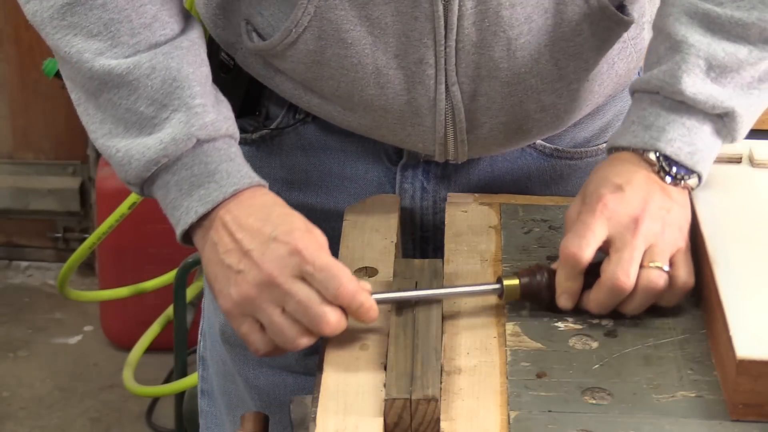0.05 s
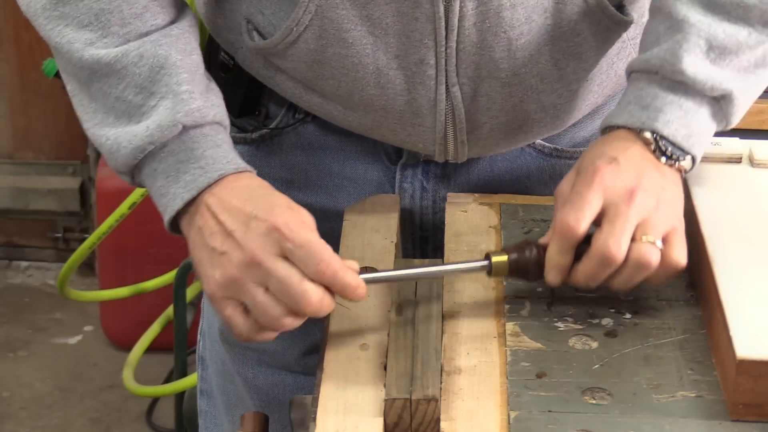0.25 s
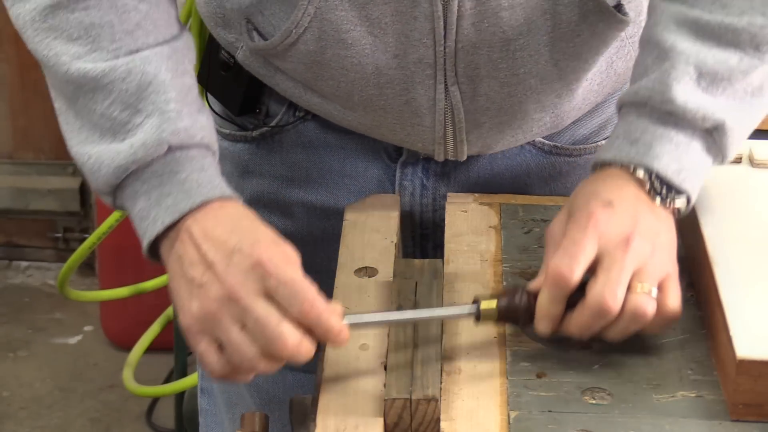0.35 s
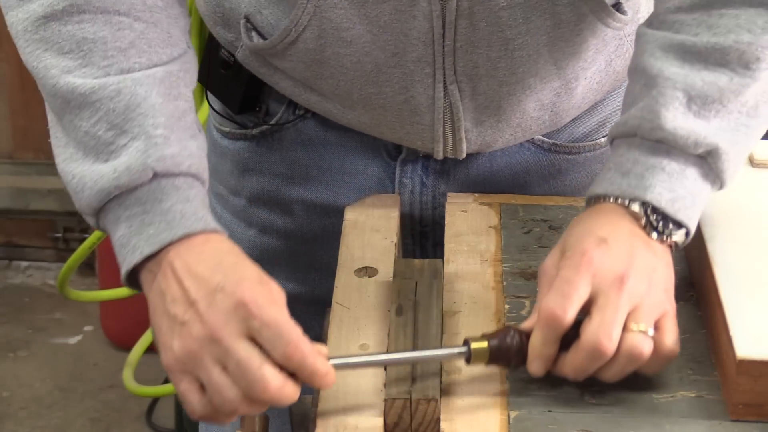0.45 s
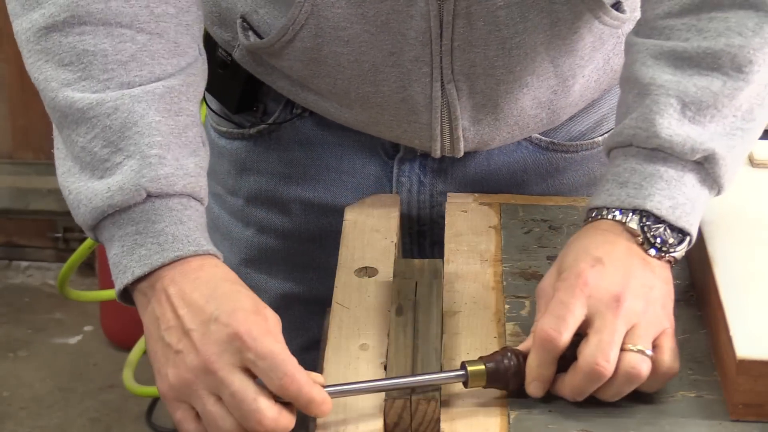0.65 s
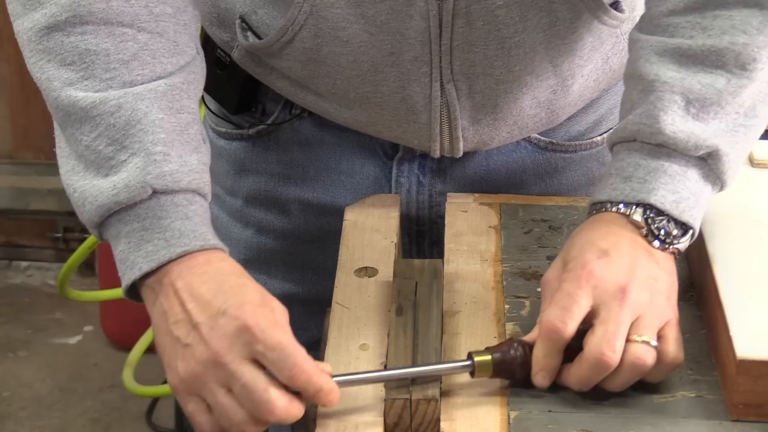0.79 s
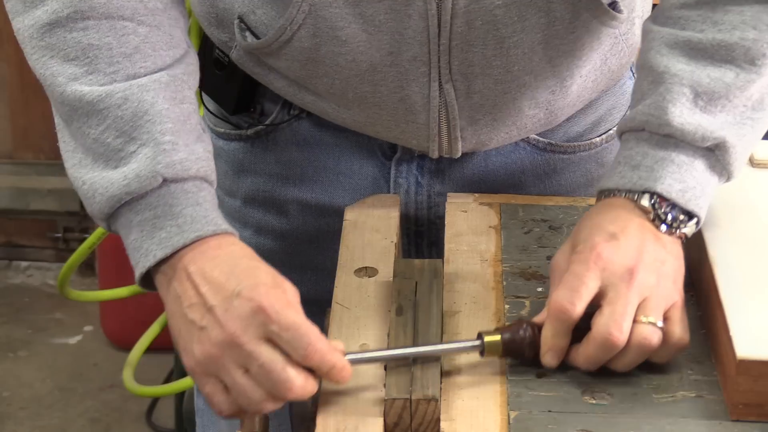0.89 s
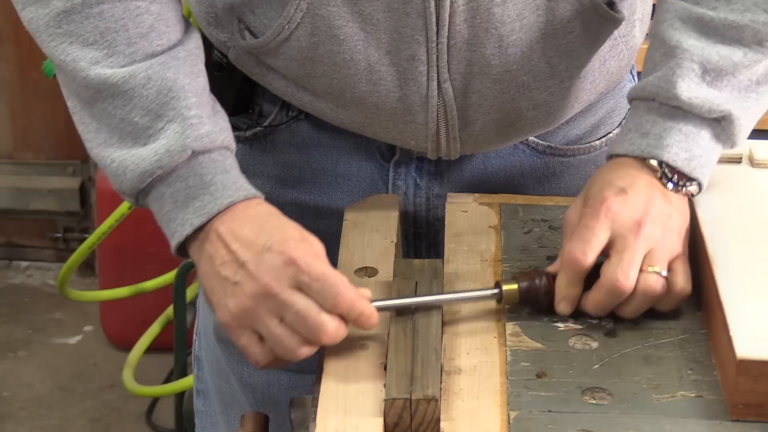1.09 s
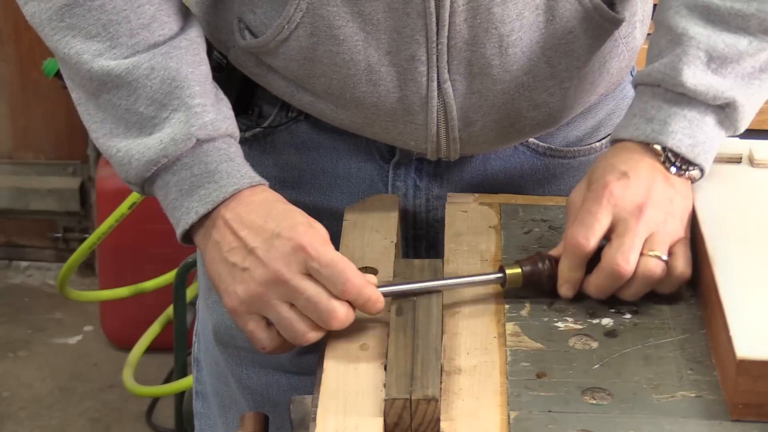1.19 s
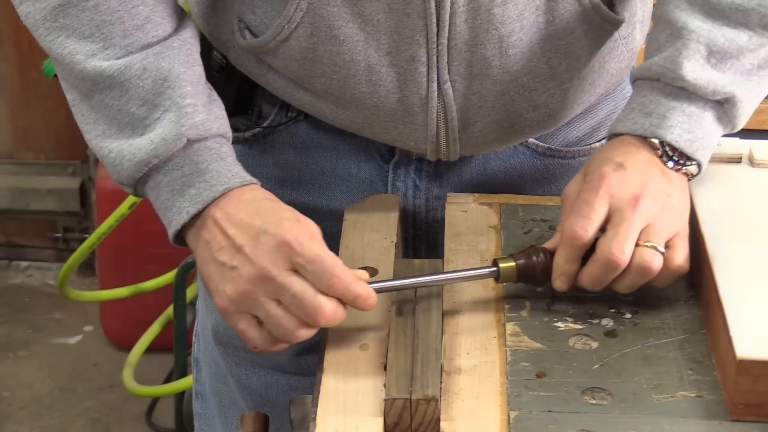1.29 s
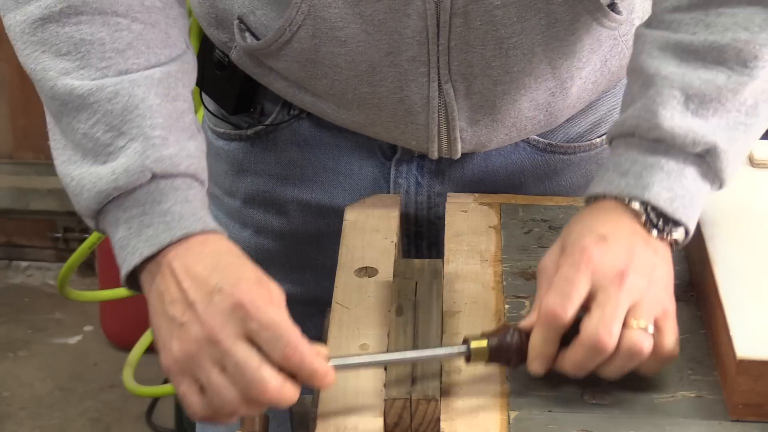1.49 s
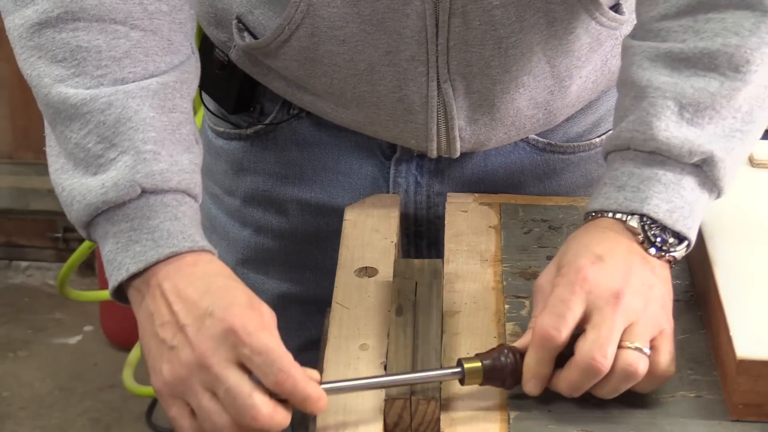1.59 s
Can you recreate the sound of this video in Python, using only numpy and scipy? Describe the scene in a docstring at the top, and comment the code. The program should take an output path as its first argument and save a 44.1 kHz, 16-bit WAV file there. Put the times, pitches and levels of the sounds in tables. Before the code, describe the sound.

Two close, gritty scrapes of a steel rod on a clamped metal blade each end in a wooden knock. Between them come a ringing metal clack and low bumps on the bench. The small workshop echoes briefly over faint hiss.

```python
"""Two rasping strokes of steel on steel, each ending in a wooden knock, in a small workshop.
A rod is drawn along the edge of a scraper clamped in a wooden bench vise: tiny slips shake rod,
edge and bench, then the rod grates over the corner and drops onto the wood. Between the strokes
it is set back on the edge with a bright clack and a few soft bumps. The room rings briefly."""
import sys
import numpy as np
from scipy import signal
from scipy.io import wavfile

SR = 44100
rng = np.random.default_rng(int(sys.argv[2]) if len(sys.argv) > 2 else 0)


def generate_wav(sig):
    """Save sig (samples, or channels by samples) to the path in sys.argv[1] as 16-bit PCM at SR."""
    pcm = np.round(np.clip(np.atleast_2d(sig).T, -1, 1) * 32767).astype(np.int16)
    wavfile.write(sys.argv[1], SR, pcm)


N = 72765
TIME = np.arange(N) / SR


def amp(db):
    """Decibels to gain."""
    return 10 ** (np.asarray(db) / 20)


def unit(x):
    """Scale to rms 1."""
    return x / np.sqrt(np.mean(x ** 2) + 1e-20)


def read(points, hz):
    """Interpolate (Hz, value) rows on a log-frequency axis."""
    points_hz, values = np.transpose(points)
    return np.interp(np.log(hz + 1), np.log(points_hz + 1), values)


def add(mix, start_s, sound):
    """Mix a sound in at start_s."""
    part = mix[max(round(start_s * SR), 0):][:len(sound)]
    part += sound[:len(part)]


def impulse(spectrum):
    """Minimum-phase click of energy 1 from (Hz, dB) rows."""
    hz = abs(np.fft.fftfreq(8192, 1 / SR))
    log_gain = np.log(amp(np.maximum(read(spectrum, hz), -100)))
    click = np.fft.ifft(np.exp(np.conj(signal.hilbert(log_gain)))).real[:4096]
    return click / np.linalg.norm(click)


def colour(x, spectrum):
    """Filter by (Hz, dB) rows, to rms 1."""
    return unit(signal.fftconvolve(x, impulse(spectrum))[:len(x)])


def resonate(x, hz, width_hz):
    """Steep resonance following the curve hz, to rms 1."""
    carrier = np.exp(2j * np.pi * np.cumsum(hz) / SR)
    pole = np.exp(-np.pi * width_hz / SR)
    return unit((carrier * signal.lfilter([1], np.poly([pole, pole]), x / carrier)).real)


def room(x, wet_db, echoes_per_s=3000):
    """Add the workshop's reflections, each band dying at its own rate."""
    # Each row: frequency in Hz, T60 in seconds.
    decay = [(100, 0.38), (260, 0.55), (700, 0.56), (1840, 0.46), (4850, 0.21), (10000, 0.19)]
    t = TIME[:SR // 2]
    taps = rng.choice([-1., 1.], len(t)) * (rng.random(len(t)) < echoes_per_s / SR) * (t > .005)
    hz, frame_s, bands = signal.stft(taps, SR, nperseg=256)
    bands = bands * amp(-60 * frame_s / read(decay, hz)[:, None])
    tail = signal.istft(bands, SR, nperseg=256)[1]
    return x + amp(wet_db) * signal.fftconvolve(x, tail / np.linalg.norm(tail))[:N]


def room_tone(level_db=-51):
    """Steady, mostly low noise of the workshop."""
    # Each row: frequency in Hz, relative level in dB.
    spectrum = [(12, -26), (20, -1.5), (129, -1.5), (569, -6), (631, -10), (716, -17), (1190, -13),
                (1390, -20.5), (1670, -20), (1890, -21), (2100, -20.5), (9000, -31), (11700, -50),
                (19800, -120)]
    return amp(level_db) * colour(rng.standard_normal(N), spectrum)


def mic_hiss(level_db=-58.5):
    """Microphone self-noise, independent in each channel."""
    spectrum_hz_db = [(15, 21), (80, 14.5), (200, 8), (1000, -2.5), (8000, 6.5), (16000, 3)]
    return amp(level_db) * np.array([colour(noise, spectrum_hz_db) for noise in rng.standard_normal((2, N))])


def bumps():
    """Hands bump the bench: low, soft swings of a few cycles at most."""
    # Each row: centre in seconds, frequency in Hz, half-width in seconds, level in dB.
    swings = [(0.718, 42.4, 0.014, -27.5), (0.778, 32.4, 0.013, -34.5), (0.821, 49.6, 0.039, -38.5),
              (0.865, 77, 0.012, -30), (0.902, 81, 0.0059, -27), (0.921, 43, 0.016, -33),
              (1.042, 65, 0.0073, -47)]
    mix = np.zeros(N)
    for centre_s, hz, width_s, db in swings:
        t = TIME - centre_s
        mix += amp(db) * np.exp(-(t / width_s) ** 2) * np.cos(2 * np.pi * hz * t)
    return mix


def ring(modes):
    """Struck modes of alternating sign, each swelling over its first cycle, then decaying."""
    t = TIME[:SR // 2]
    mix = np.zeros(len(t))
    for k, (hz, db, t60_s) in enumerate(modes):
        attack = 1 - np.exp(-(hz * t) ** 2)
        mix += (-1) ** k * attack * amp(db - 60 * t / t60_s) * np.sin(2 * np.pi * hz * t)
    return mix


def impacts(hits, modes, spectrum, modes_db, click_db, dense_db, dense_t60_s, wet_db):
    """Each hit: a blow (contact click and fast-dying dense modes) in the room, plus a dry ring."""
    t, blows, rings = TIME[:SR // 2], np.zeros(N), np.zeros(N)
    for start_s, blow_db, ring_db in hits:
        burst = rng.standard_normal(len(t)) * amp(-60 * t / dense_t60_s)
        dense = colour(burst, spectrum)
        add(blows, start_s, amp(blow_db + dense_db) * dense / np.linalg.norm(dense))
        add(blows, start_s, amp(blow_db + click_db) * impulse(spectrum))
        add(rings, start_s, amp(ring_db + modes_db) * ring(modes))
    return room(blows, wet_db) + rings


def clacks():
    """The rod lands on the steel edge and bounces; rod and blade ring."""
    # Each row: start in seconds, blow gain in dB, ring gain in dB.
    hits = [(.7221, -2, 3.5), (.7233, -2, -8.5), (.7302, -9, -14)]
    # Each row: frequency in Hz, relative level in dB, T60 in seconds.
    steel_modes = [(191, 2.5, 0.13), (261.5, 0.5, .16), (393, -11, 0.32), (432, -8, 0.39), (913, -4, 0.24),
                   (917, -3.5, 0.24), (1118, -5, 0.31), (1278, 6, 0.14), (1442, 2, 0.071),
                   (1532, -7.5, 0.18), (2069, 10, 0.031), (2980, 9.5, 0.027), (3094, -11, 0.039),
                   (5520, -2, 0.054)]
    # Each row: frequency in Hz, relative level in dB.
    crack_spectrum = [(90, -13), (180, -7.5), (260, 4.5), (320, -4.5), (400, 6.5), (470, -2.5), (560, -25),
                      (720, -13.5), (860, -0.5), (1450, 1.5), (1680, -20), (2000, 6.5), (2400, -10),
                      (2850, -0.5), (3350, -30), (3780, -3), (4550, -20), (5550, -11), (6100, -24.5),
                      (8700, -36), (9400, -29), (10200, -47), (16000, -70)]
    return impacts(hits, steel_modes, crack_spectrum,
                   modes_db=-29.5, click_db=6.5, dense_db=6, dense_t60_s=0.058, wet_db=-12)


def knocks():
    """The rod drops off the blade onto the wooden jaws and rebounds; vise and bench ring."""
    # Each row: start in seconds, blow gain in dB, ring gain in dB.
    hits = [(.2228, 0, -1), (.2285, -7.5, -17), (.243, -11, -17.5), (1.2998, -4, -3.5),
            (1.3195, -14.5, -31)]
    # Each row: frequency in Hz, relative level in dB, T60 in seconds.
    wood_modes = [(150.4, 1, 0.14), (198, 2, 0.29), (296, -28, 0.26), (306, 2, .13), (404.6, 3.5, 0.21),
                  (431.4, -2.5, 0.26), (478, 2.5, 0.15), (664, -4, 0.24), (820, 6, 0.094),
                  (884, -31, 0.062), (1035, -33, 0.42), (1058, -4.5, 0.28), (1542, -8, 0.067)]
    # Each row: frequency in Hz, relative level in dB.
    thud_spectrum = [(25, -42), (60, -8), (115, -13.5), (195, -3), (248, -7), (320, -0.5), (460, 1),
                     (570, -9.5), (670, -3), (740, -11), (840, 4.5), (950, -5), (1060, -8.5), (1200, -13.5),
                     (1550, -23), (2000, -34), (3300, -32), (5500, -59), (10000, -77), (16000, -97)]
    return impacts(hits, wood_modes, thud_spectrum,
                   modes_db=-22.5, click_db=6, dense_db=6.5, dense_t60_s=0.066, wet_db=-9.5)


def bites(bursts, spectrum):
    """Short bursts of friction noise where the rod bites."""
    gate = np.zeros(N)
    for start_s, length_s, db in bursts:
        gate += amp(db) * np.interp(TIME - start_s, [-.001, 0, length_s, length_s + .0045], [0, 1, 1, 0])
    return gate * colour(rng.standard_normal(N), spectrum)


def catches():
    """The rod catches on the edge and shakes the bench."""
    # Each row: start in seconds, length in seconds, level in dB.
    bursts = [(.02, 0.013, -40), (1.09, 0.015, -41), (1.126, 0.0027, -29.5), (1.144, 0.0065, -32.5),
              (1.206, 0.014, -28.5)]
    # Each row: frequency in Hz, relative level in dB.
    spectrum = [(100, -41), (200, -14), (330, -1), (470, 6), (700, -11.5), (900, 3), (1060, -5.5),
                (1300, -15), (3000, -33), (4200, -36), (6000, -38), (12000, -65)]
    return bites(bursts, spectrum)


def grates():
    """The rod grates over the corner or a nick."""
    # Each row: start in seconds, length in seconds, level in dB.
    bursts = [(.1718, .001, -33.5), (.210, 0.0034, -43), (.215, 0.011, -29.5), (1.2835, 0.012, -30)]
    # Each row: frequency in Hz, relative level in dB.
    spectrum = [(120, -45), (200, -2), (903, 5.5), (1510, -13.5), (1950, 2), (2440, -11.5), (3260, -4),
                (3870, -17), (5550, -10), (6150, -21), (7820, -17.5), (8820, -34), (12000, -42),
                (15600, -70), (22000, -120)]
    return bites(bursts, spectrum)


def grit(slips_per_s=6000, spread_db=3.5, chatter_per_s=180, chatter_db=3):
    """Dense tiny slips of steel on steel, clumped by chatter."""
    size = amp(spread_db * np.minimum(rng.exponential(1, N), 4)) * rng.choice([-1, 1], N)
    chatter = np.interp(TIME * chatter_per_s, np.arange(N), rng.standard_normal(N))
    return size * (rng.random(N) < slips_per_s / SR) * amp(chatter_db * chatter)


def sliding(resonances, travel):
    """Grit rings resonances whose wavelength changes in step with the rod's travel (0 to 1)."""
    mix = np.zeros(N)
    for start_hz, end_hz, width_hz, start_db, end_db in resonances:
        hz = 1 / ((1 - travel) / start_hz + travel / end_hz)
        mix += amp(start_db + (end_db - start_db) * travel) * resonate(grit(), hz, width_hz)
    return mix


def strokes():
    """Grit drives the bench's drone and sway, the rod's rasp and the edge's hiss and whistle."""
    # One list per stroke. Each row: time in seconds, then drone, rasp and hiss gains in dB.
    envelopes = [
        [(0.0, -26.5, -38, -50), (0.016, -43.5, -38.5, -50.5), (0.086, -49, -45.5, -54),
         (0.168, -46.5, -41.5, -47.5), (0.205, -45, -45.5, -50.5)],
        [(0.86, -75, -52, -55.5), (0.912, -41.5, -46, -59), (0.936, -49, -39, -51.5),
         (0.986, -48, -40.5, -55.5), (1.124, -35.5, -36.5, -45.5), (1.17, -42, -41.5, -51.5),
         (1.24, -37.5, -39.5, -50), (1.254, -37, -46, -49), (1.275, -63, -45, -52)],
    ]
    # Spectra. Each row: frequency in Hz, relative level in dB.
    bench_drone = [(76, -44), (130, -44), (140, -33), (189, -9), (291, -4), (323, -3), (350, -5), (414, -4),
                   (750, -19), (980, -67), (1650, -120)]
    steel_rasp = [(440, -32), (750, -5), (925, -4), (1210, -5.5), (1600, -6.5), (1740, -10), (1970, -15),
                  (2290, -12.5), (2760, -12), (4020, -23), (4500, -28), (5850, -61), (9900, -120)]
    edge_hiss = [(2500, -12), (4000, -7.5), (5400, 3), (6500, -2.5), (8400, -9.5), (9500, -17),
                 (11000, -42), (16000, -70)]
    bench_sway = [(15, -3), (45, -7), (80, 4.5), (130, -5), (300, -41)]
    # Gliding resonances. Each row: start, end and width in Hz, start and end gain in dB.
    rod_low = [(191, 205, 55, -8, -1.5), (484, 279, 84, -3, 3)]
    rod_mid = [(1119, 905, 52, -10, -0.5), (2000, 1970, 230, -7, -17.5), (2720, 2910, 740, -12, -11)]
    edge_whistle = [(5870, 5900, 280, -14, -5.5), (6560, 6800, 2100, -15, -11)]
    slide_s = 0.204  # fast end of a stroke, where the rod's free length grows
    mix = np.zeros(N)
    for envelope in envelopes:
        times_s, *gains_db = np.transpose(envelope)
        start_s, end_s = times_s[0], times_s[-1]
        gate = np.interp(TIME, [start_s - .02, start_s, end_s, end_s + .013], [0, 1, 1, 0])
        drone_gain, rasp_gain, hiss_gain = (gate * amp(np.interp(TIME, times_s, db)) for db in gains_db)
        travel = np.clip(1 - (end_s - TIME) / slide_s, 0, 1)
        slips = grit()
        drone = colour(slips, bench_drone) + amp(-13) * colour(slips, bench_sway)
        drone += sliding(rod_low, travel)
        rasp = amp(-4.5) * colour(slips, steel_rasp) + sliding(rod_mid, travel)
        hiss = amp(-6) * colour(slips, edge_hiss) + sliding(edge_whistle, travel)
        mix += drone_gain * drone + rasp_gain * rasp + hiss_gain * hiss
    return mix


def scene():
    """Bench work and room tone in the centre, over stereo hiss."""
    friction = strokes() + grates() + catches()
    centre = room(friction, wet_db=-10.5) + knocks() + clacks() + bumps() + room_tone()
    return centre + mic_hiss()


def record(dry):
    """Microphone low cut, then a steep band limit."""
    low_cut_hz, band_limit_hz = 13, 15850
    highpass = signal.butter(2, low_cut_hz, "highpass", fs=SR, output="sos")
    lowpass = signal.firwin(511, band_limit_hz, window=("kaiser", 9), fs=SR)
    return signal.oaconvolve(signal.sosfilt(highpass, dry), lowpass[None], "same")


dry = scene()
out = record(dry)
generate_wav(out)
```